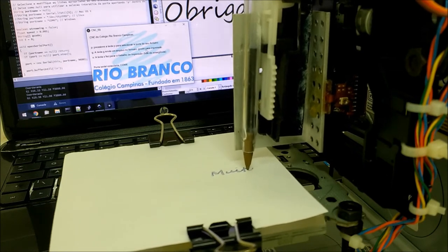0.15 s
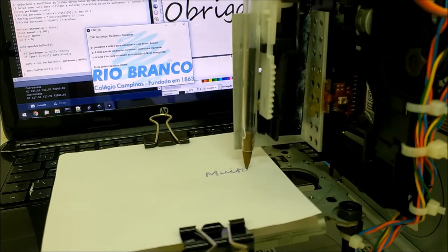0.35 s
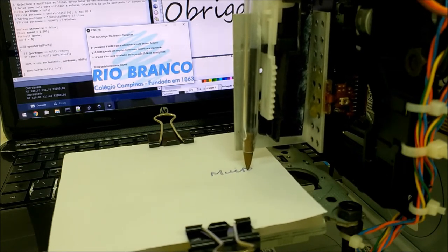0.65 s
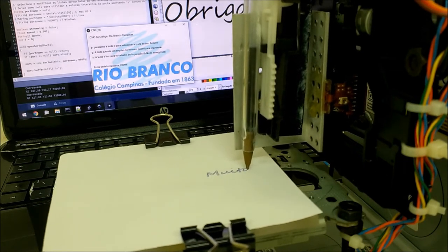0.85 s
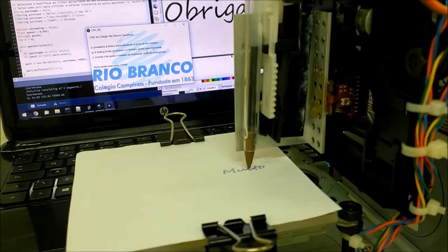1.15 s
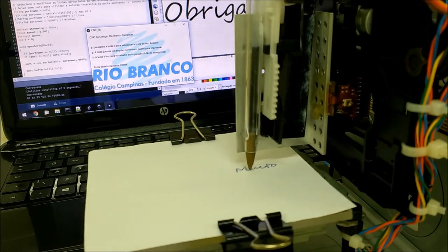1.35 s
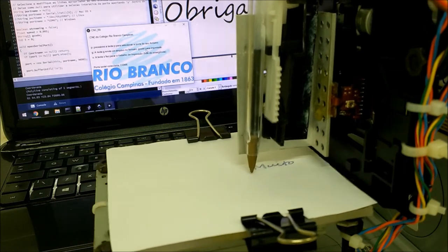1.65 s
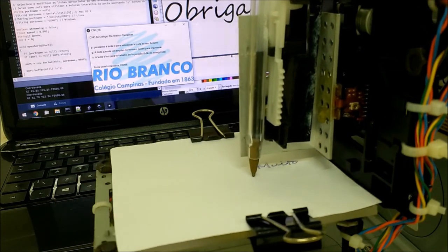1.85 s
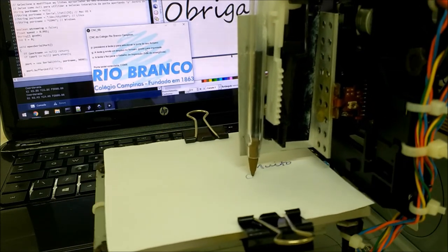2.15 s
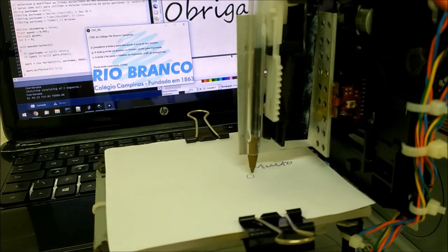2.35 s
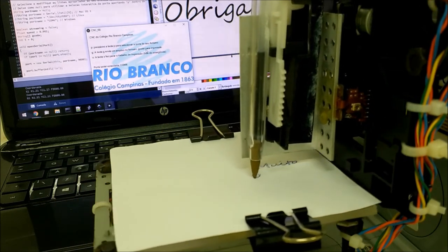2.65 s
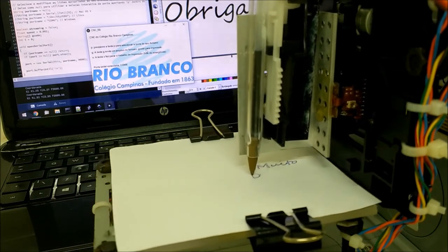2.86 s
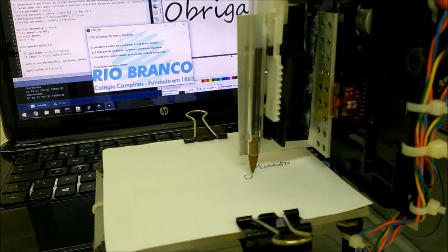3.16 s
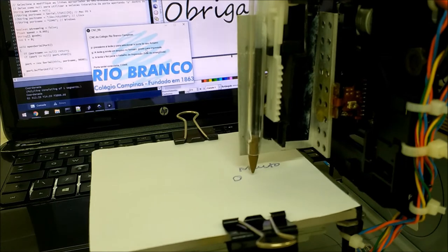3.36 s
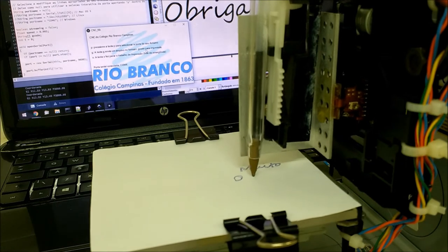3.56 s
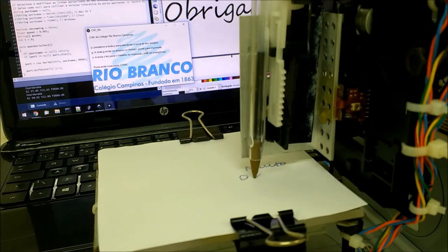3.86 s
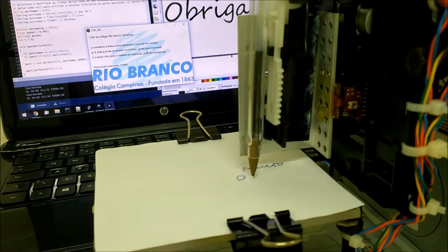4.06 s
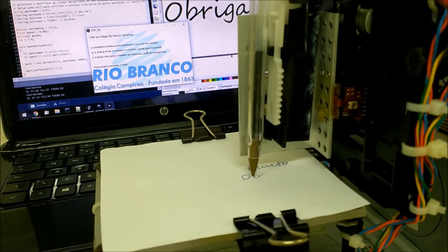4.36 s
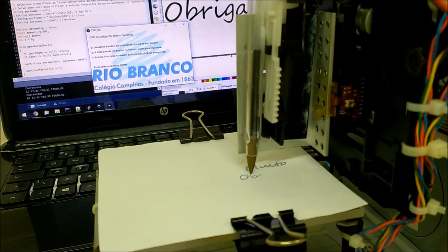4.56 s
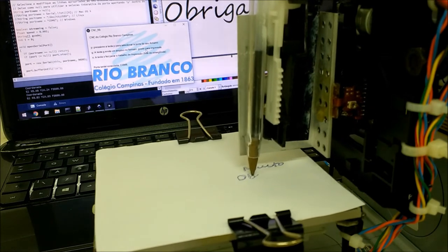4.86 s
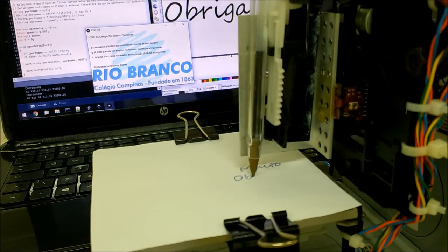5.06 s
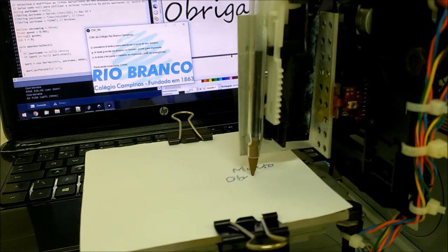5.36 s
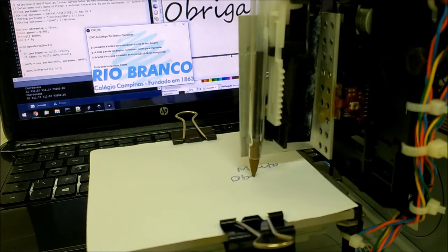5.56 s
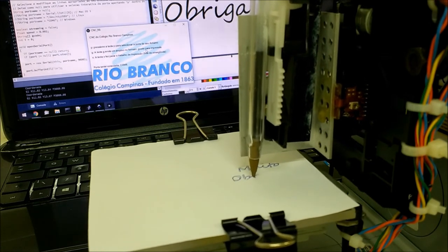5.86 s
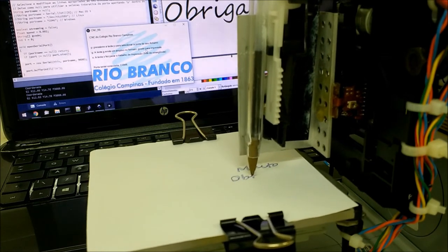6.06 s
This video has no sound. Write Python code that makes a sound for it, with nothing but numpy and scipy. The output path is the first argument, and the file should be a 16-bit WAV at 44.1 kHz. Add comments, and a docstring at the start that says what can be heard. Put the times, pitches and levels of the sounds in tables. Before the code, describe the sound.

A desktop drawing machine works right beside the microphone. Its motors stutter at one very high pitch, softer at first, buzz steadily for under a second while the bed shifts, then continue more strongly in tiny pulses. Dry friction noise, short chattering squeaks and very faint frame thuds accompany it, with a soft fan-like hum and small, dry room reflections.

```python
"""Stepper motors of a small pen plotter whine near 3.9 kHz, twice the rate at which their coil current is chopped.
The whine stutters in short dwells while the pen draws; in fast moves motion splits it into a buzz of even sidebands.
Friction of lead screws and slides is shaped noise with rasps and stick-slip squeaks, and the frame thuds faintly.
Below lies a low hum of narrow, wavering tones, perhaps a nearby laptop fan.
A quiet room adds short reflections, and two close microphone ports hear it all."""
import sys
import numpy as np
from scipy import signal
from scipy.fft import rfft, irfft, next_fast_len
from scipy.io import wavfile
from scipy.ndimage import uniform_filter1d

SR = 44100
rng = np.random.default_rng(int(sys.argv[2]) if len(sys.argv) > 2 else 0)


def generate_wav(signal):
    """Clip the signal to [-1, 1] and save it as 16-bit WAV at the path in sys.argv[1]."""
    frames = np.transpose(np.atleast_2d(signal))
    scaled = np.clip(frames, -1, 1) * 32767
    pcm = np.round(scaled).astype(np.int16)
    wavfile.write(sys.argv[1], SR, pcm)


N = 274302
TIME = np.arange(N) / SR
CHOP_HZ = 1952  # rate at which the coil current is chopped

# dwells, in which a rotor rests on a step that sings: start_s, length_s, level_db (before gain and swing)
DWELL_STEPS = [(0.078, 0.013, -38.5), (0.103, 0.013, -34), (0.161, 0.0083, -33.5), (0.19, 0.021, -35.5),
               (0.211, 0.0089, -34), (0.254, 0.013, -33), (0.3, 0.015, -34.5), (0.326, 0.014, -34.5),
               (0.357, 0.008, -36), (0.373, 0.01, -35), (0.395, 0.009, -33), (0.418, 0.031, -33),
               (0.453, 0.046, -33.0), (0.509, 0.028, -32.5), (0.599, 0.011, -35.0), (0.609, 0.015, -32),
               (0.649, 0.011, -34.5), (0.67, 0.0077, -34), (0.723, 0.015, -32.0), (0.739, 0.017, -35),
               (0.764, 0.012, -34.0), (0.814, 0.012, -37), (0.835, 0.0093, -35), (0.896, 0.013, -33.5),
               (0.916, 0.067, -34), (1.778, 0.012, -28.5), (1.823, 0.013, -33), (1.845, 0.011, -28),
               (1.865, 0.014, -30), (1.897, 0.0096, -33.0), (1.925, 0.016, -23.5), (1.954, 0.009, -33.0),
               (1.965, 0.018, -31), (1.99, 0.0087, -30), (2.012, 0.0089, -31), (2.064, 0.012, -28),
               (2.091, 0.01, -30.0), (2.116, 0.011, -30.5), (2.134, 0.013, -27.5), (2.167, 0.019, -32.5),
               (2.203, 0.054, -27.5), (2.265, 0.014, -28.0), (2.285, 0.013, -30.5), (2.309, 0.014, -33.0),
               (2.468, 0.035, -31.0), (2.504, 0.015, -27.5), (2.522, 0.012, -31), (2.544, 0.0096, -28.5),
               (2.591, 0.011, -25.5), (2.627, 0.0084, -28), (2.656, 0.009, -32.5), (2.685, 0.013, -34),
               (2.719, 0.0099, -29.5), (2.736, 0.011, -30), (2.782, 0.0081, -30), (2.8, 0.015, -30),
               (2.817, 0.016, -28), (2.836, 0.0097, -22.5), (2.847, 0.015, -26), (2.888, 0.01, -29),
               (2.914, 0.013, -31.5), (2.948, 0.0088, -31), (2.979, 0.011, -30.0), (3.029, 0.012, -29.5),
               (3.047, 0.013, -29.0), (3.103, 0.0086, -28.5), (3.122, 0.017, -29), (3.143, 0.014, -30.5),
               (3.164, 0.033, -28.5), (3.21, 0.055, -29), (3.455, 0.036, -27.5), (3.513, 0.017, -31.5),
               (3.545, 0.018, -28), (3.588, 0.011, -29), (3.601, 0.012, -26.5), (3.646, 0.012, -29.0),
               (3.668, 0.012, -30.0), (3.694, 0.009, -31), (3.706, 0.015, -27.5), (3.724, 0.012, -29),
               (3.745, 0.014, -33.5), (3.76, 0.0097, -27.5), (3.823, 0.012, -28.5), (3.838, 0.012, -32),
               (3.855, 0.02, -27.5), (3.891, 0.009, -26.5), (3.905, 0.013, -28.5), (3.921, 0.01, -33.5),
               (3.943, 0.0096, -31), (3.957, 0.011, -29), (3.997, 0.011, -31.0), (4.01, 0.012, -29),
               (4.029, 0.011, -29.5), (4.044, 0.01, -29), (4.058, 0.013, -28), (4.074, 0.027, -27.5),
               (4.106, 0.0072, -33.5), (4.12, 0.01, -30.5), (4.137, 0.026, -34.5), (4.171, 0.01, -29.5),
               (4.19, 0.01, -29.0), (4.209, 0.011, -29.5), (4.245, 0.0092, -28), (4.26, 0.016, -32),
               (4.291, 0.041, -28.5), (4.352, 0.0078, -32), (4.377, 0.03, -27), (4.41, 0.015, -26.5),
               (4.428, 0.023, -29), (4.452, 0.0069, -26), (4.467, 0.033, -26.5), (4.517, 0.02, -30.5),
               (4.554, 0.022, -28), (4.579, 0.013, -29), (4.615, 0.0081, -30), (4.629, 0.018, -30),
               (4.669, 0.027, -26.5), (4.727, 0.025, -32), (4.755, 0.014, -27), (4.791, 0.016, -28.5),
               (4.827, 0.012, -27), (4.843, 0.015, -27.0), (4.863, 0.011, -28.5), (4.885, 0.011, -30.0),
               (4.941, 0.012, -32.5), (5.002, 0.012, -27.5), (5.015, 0.019, -28.5), (5.039, 0.0081, -34.0),
               (5.065, 0.012, -29), (5.08, 0.013, -28), (5.109, 0.0087, -28.5), (5.159, 0.012, -29),
               (5.186, 0.012, -29.0), (5.21, 0.01, -30.5), (5.232, 0.075, -29.5), (5.38, 0.022, -28.5),
               (5.404, 0.023, -32), (5.44, 0.011, -26.5), (5.453, 0.012, -28.5), (5.484, 0.012, -32.5),
               (5.491, 0.017, -31.5), (5.518, 0.014, -30), (5.538, 0.014, -29.5), (5.558, 0.009, -32.5),
               (5.598, 0.0088, -29), (5.616, 0.0069, -28), (5.626, 0.015, -28.5), (5.643, 0.037, -29),
               (5.688, 0.013, -33.5), (5.725, 0.026, -27.5), (5.777, 0.016, -28), (5.81, 0.015, -28),
               (5.85, 0.013, -29), (5.881, 0.016, -36), (5.922, 0.043, -27.5), (5.971, 0.04, -31.0),
               (6.037, 0.009, -28.5), (6.05, 0.01, -28.5), (6.063, 0.011, -30.5), (6.096, 0.022, -29.0),
               (6.119, 0.019, -35.5), (6.154, 0.022, -29.5), (6.182, 0.013, -28)]


def amp(db):
    """Level to linear amplitude: 20 dB for each factor of ten."""
    return 10 ** (np.asarray(db) / 20)


def evened(x):
    """Normalisation to an rms of one."""
    return x / np.sqrt(np.mean(abs(x) ** 2) + 1e-20)


def read(points, hz):
    """Spectrum table interpolated on a logarithmic frequency axis."""
    f, value = np.transpose(points)
    return np.interp(np.log(hz + 1), np.log(f + 1), value)


def follow(rows, t):
    """Linear interpolation of each column of a curve table at times t."""
    s, *columns = np.transpose(rows)
    return [np.interp(t, s, c) for c in columns]


def gate(start, end, edge):
    """Switching window: one between two times, with linear edges."""
    return np.clip(np.minimum(TIME - start, end - TIME) / edge + .5, 0, 1)


def tone(hz, envelope):
    """Modulation of a sine by a complex envelope, whose rms it keeps."""
    return np.sqrt(2) * (envelope * np.exp(2j * np.pi * hz * TIME)).real


def waver(width_hz):
    """Narrow-band modulation: low-passed complex noise, half amplitude at width_hz."""
    t = np.arange(0, 7, 1 / 1000)
    z = rng.standard_normal(len(t)) + 1j * rng.standard_normal(len(t))
    f = np.fft.fftfreq(len(t), t[1])
    slow = np.fft.ifft(np.fft.fft(z) / (1 + (f / width_hz) ** 2))
    return evened(np.interp(TIME, t, slow))


def stepping(per_s):
    """Random stepwise modulation: coil current takes a new size and phase at every microstep."""
    step = np.cumsum(rng.random(N) < per_s / SR)
    z = rng.uniform(0.13, 1, N) * np.exp(2j * np.pi * rng.random(N))
    return evened(uniform_filter1d(z[step], size=60))


def flutter():
    """Amplitude modulation at a wandering rate, as the rotors speed up and hesitate."""
    rate_hz, wander, depth = 38, .6, .36  # the last two are shares
    turns = np.cumsum(rate_hz * (1 + wander * waver(width_hz=25).real)) / SR
    return evened(1 + depth * np.tanh(2 * np.sin(2 * np.pi * turns)))


def room(x, t60=0.025):
    """Early reflection: sparse decaying echoes from desk, screen and walls, different at each port."""
    t = np.arange(SR // 3) / SR
    sparse = rng.standard_normal((2, len(t))) * (rng.random((2, len(t))) < 2000 / SR)
    taps = sparse * amp(-60 * t / t60) * (t > .002)
    taps /= np.linalg.norm(taps, axis=1, keepdims=True)
    return signal.fftconvolve(x, taps, axes=1)[:, :N]


def hum(swell_db=-1):
    """Narrow-band random modulation: a low hum of wavering tones, two of which also swell and fade."""
    # steady-level tones: pitch_hz, width_hz, level_db, unsteady_share
    hum_tones = [(236, 9.9, -72.5, 0.67), (254, 2.9, -71.5, 0.63), (445.6, 9, -60.5, 0.77),
                 (485, 16, -54, 0.44), (595, 23, -60, .95), (704, 20, -61, 1), (979, 4.5, -83, 0.47)]
    # the two swelling tones: pitch_hz, width_hz, unsteady_share
    swelling_tones = [(516, 7, .22), (777, 16, .9)]
    # their levels before swell_db: time_s, lower_db, upper_db
    swell_curve = [(0.0, -59, -60), (0.35, -53, -46.5), (0.619, -48, -46.5), (0.9, -50, -53.5),
                   (1.6, -53.5, -56), (2.501, -74, -53.5), (3.4, -75, -53.5), (6.22, -69, -55.5)]
    out = np.zeros(N)
    for (hz, width, unsteady), db in zip(swelling_tones, follow(swell_curve, TIME)):
        out += tone(hz, amp(db + swell_db) * evened(1 - unsteady + unsteady * waver(width)))
    for hz, width, db, unsteady in hum_tones:
        out += tone(hz, amp(db) * evened(1 - unsteady + unsteady * waver(width)))
    return out


def shudder():
    """Impulsive excitation: each stop of a rotor jerks the frame into a low thud, unrelated at the two ports."""
    below_dwell_db, spread_db, decay_s, rumble_db = 57.5, 14, 0.021, -110
    low = signal.sosfilt(signal.butter(3, 90, fs=SR, output="sos"), rng.standard_normal((2, N)))
    jerks = np.zeros(N)
    for (s, _, db), chance in zip(DWELL_STEPS, rng.uniform(-0.42, 1, len(DWELL_STEPS))):
        jerks[int(np.clip(s * SR, 0, N - 1))] = amp(db - below_dwell_db + spread_db * chance)
    decaying = signal.lfilter([1], [1, -np.exp(-1 / (decay_s * SR))], jerks)
    return (amp(rumble_db) + decaying) * evened(low)


def rubbing(travel_hiss, patchy_db=1.68, flicker_db=1.0, body_depth=0.52, fizz_depth=0.77):
    """Friction noise: random spectra shaped by the rubbing effort, with rasps at rough spots and a fine flicker."""
    # relative spectrum of screws and slides: frequency_hz, level_db
    friction_spectrum = [(90, -27), (130, -37), (190, -38), (250, -12.5), (330, -11), (470, -4), (1000, -2),
                         (1400, 1), (3500, -1.5), (4450, -3.5), (5050, -8), (5560, -2.5), (6000, -1),
                         (6600, -4.5), (10500, -9), (13000, -12.5), (15700, -14)]
    # how hard they rub; only departures from each mean count: time_s, body_db, fizz_db
    effort = [(0.0, -37.5, -42), (0.28, -36.5, -46.5), (1.12, -43.5, -43), (1.56, -37.5, -42),
              (1.73, -42, -46.5), (1.91, -30, -50), (2.1, -38.5, -46.5), (2.55, -36, -47.5),
              (3.0, -40.5, -41), (3.3, -39, -46), (4.35, -42, -44), (4.5, -39.5, -43), (4.92, -40.5, -46),
              (5.08, -41.5, -45.5), (5.55, -42.5, -38), (5.78, -43, -41.5), (6.22, -45, -43.5)]
    # rough spots rasping in one band: centre_s, half_length_s, centre_hz, half_width_hz, rise_db, glide_hz_per_s
    rough_spots = [(0.16, 0.048, 8800, 400, 11.5, 0), (0.314, 0.16, 1296, 92, 8.5, 0),
                   (0.39, 0.076, 4500, 303, 9.5, 0), (0.93, 0.11, 6720, 507, 11, 0),
                   (0.453, 0.029, 1510, 100, 12, 0), (2.125, 0.044, 2640, 120, 13, 0),
                   (2.317, 0.12, 2380, 170, -3, -1500), (2.53, 0.055, 3000, 220, 7, -2000),
                   (2.584, 0.05, 4220, 250, 10.5, 0), (2.751, 0.11, 2320, 120, 6, 0),
                   (4.298, 0.078, 3470, 170, 7, -2000), (4.461, 0.097, 3310, 200, 12, 0),
                   (4.613, 0.14, 10700, 700, 10.5, 3002), (5.291, 0.1, 4904, 300, 11, 0),
                   (5.554, 0.055, 3464, 292, 13, 2), (5.545, 0.029, 11780, 2300, 14.5, 0),
                   (5.591, 0.083, 1565, 100, 5.5, 0), (5.64, 0.036, 10500, 1200, 10, 0),
                   (5.847, 0.044, 11300, 1900, 9, 0), (5.92, 0.11, 9640, 400, 16, -2500)]
    # screw hiss around chopper lines in fast moves: chop_multiple, half_width_hz, rise_db (at full hiss)
    hiss_bands = [(2, 590, 5), (4, 970, 3.5)]
    # likeness of the noise at the two ports: frequency_hz, likeness_share
    likeness = [(200, 0.84), (700, 0.98), (1500, 0.58), (3500, 0.84), (6000, 0.94), (10000, 0.5),
                (15000, 1)]
    # frames of 512 samples, 128 apart
    t, hz = np.arange(N // 128 + 5) * 128 / SR, np.fft.rfftfreq(512, 1 / SR)
    a, b, c, d, patches = rng.standard_normal((5, len(t), len(hz)))
    patches = uniform_filter1d(patches, size=16, axis=0)
    patches = evened(uniform_filter1d(patches, size=5, axis=1))
    body, fizz = (level - level.mean() for level in follow(effort, t))
    field_db = read(friction_spectrum, hz) + patchy_db * patches
    field_db += flicker_db * rng.standard_normal((len(t), 1))
    # share of each effort felt at each frequency
    body_share = read([(500, 0.3), (1300, 0.57), (4000, 0.72), (8000, 0.66)], hz)
    fizz_share = read([(4000, 0.067), (9000, 0.84)], hz)
    field_db += body_depth * np.outer(body, body_share) + fizz_depth * np.outer(fizz, fizz_share)
    for s, length, centre, width, db, glide in rough_spots:
        since = t[:, None] - s
        field_db += db * np.exp(-(since / length) ** 2 - ((hz - centre - glide * since) / width) ** 2)
    travelling = np.interp(t, TIME, travel_hiss)
    for k, width, db in hiss_bands:
        field_db += db * np.outer(travelling, np.exp(-((hz - round(k) * CHOP_HZ) / width) ** 2))
    # the second port shares part of the first port's noise
    same, left = np.clip(read(likeness, hz), 0, 1), a + 1j * b
    right = same * left + np.sqrt(1 - same ** 2) * (c + 1j * d)
    z = np.array([left, right]) * amp(field_db)
    noise = signal.istft(z.transpose(0, 2, 1), nperseg=512, noverlap=384)[1][:, :N]
    return amp(-36.5) * evened(noise)


def squeaks():
    """Stick-slip oscillation of the slides: short chattering tones that swell, fade and arch in pitch."""
    # centre_s, half_length_s, pitch_hz (before arch and jitter), glide_hz_per_s, level_db (before chatter)
    squeak_events = [(1.533, .018, 3070, 0, -42), (2.262, .04, 2670, -1300, -41),
                     (2.33, .045, 2400, -8, -40), (2.335, 0.057, 2280, -300, -39),
                     (2.516, 0.021, 3110, 0, -40), (2.572, 0.019, 2694, -2500, -41.5),
                     (2.709, .02, 2380, 0, -51), (2.869, 0.021, 2910, 0, -38),
                     (3.282, 0.034, 2280, -3, -43), (3.35, .042, 2190, -300, -39),
                     (3.435, 0.019, 2820, 0, -51), (3.91, .05, 2394, -600, -43),
                     (4.313, 0.03, 3340, -500, -39), (4.481, .04, 3240, -800, -43),
                     (4.487, .06, 2140, 1700, -39.5), (5.565, 0.024, 3227, -2000, -37),
                     (5.682, .035, 3020, 0, -42.5)]
    arch_hz, jitter_hz, chatter_share = 45, 50, .9  # the arch is the drop half a length from the centre
    jitter, chatter = jitter_hz * waver(width_hz=60).real, chatter_share * waver(width_hz=90)
    out = np.zeros(N)
    for s, length, hz, glide, db in squeak_events:
        at = np.flatnonzero(abs(TIME - s) < np.pi * length)
        since = TIME[at] - s
        draw = (at + rng.integers(N)) % N  # a random stretch of the jitter and chatter
        pitch = hz + glide * since - arch_hz * (since / length) ** 2 + jitter[draw]
        swell = amp(db) * np.exp(-(since / length) ** 2) * evened(1 + chatter[draw])
        out[at] += np.sqrt(2) * (swell * np.exp(2j * np.pi * np.cumsum(pitch) / SR)).real
    return out


def buzz(sidebands, rate_hz, on):
    """Sideband modulation: the turning field splits chopper lines into evenly spaced ones that sway in level."""
    out, t = np.zeros(N), TIME[on > 0]
    for k, order, db in sidebands:
        start, sway, pace = rng.random(3)
        level = amp(db) * (.95 + .35 * np.sin(2 * np.pi * (sway + (3 + 9 * pace) * t)))
        turns = start + (k * CHOP_HZ + order * rate_hz) * t
        out[on > 0] += np.sqrt(2) * level * np.cos(2 * np.pi * turns)
    return out


def travel(on, bed_db, carriage_db, idle_db, lean_db):
    """Load-dependent modulation in a fast move: the bed's main line leans towards its first lower sideband."""
    # all three: chop_multiple, motor_rate_multiple, level_db (before the gain of the move, lean and sway)
    bed_lines = [(2, -3, -59), (2, -2, -52), (2, -1, -51.5), (2, 0, -46), (2, 2, -53), (4, -3, -59),
                 (4, -2, -52), (4, 0, -56), (4, 1, -56), (4, 2, -54), (4, 3, -52), (4, 4, -58), (4, 5, -62),
                 (6, -5, -66), (6, -3, -66)]
    carriage_lines = [(1, -1, -56), (1, 0, -59), (2, -4, -59), (2, -3, -56), (3, -3, -51), (3, 4, -52),
                      (4, -4, -59)]
    # lines of an idling coil
    idle_lines = [(1, 0, -47), (3, 0, -41), (4, 0, -48)]
    bed_hz, carriage_hz = 215.5, 38  # sideband spacing at full speed
    lean = {(2, -1): lean_db, (2, 0): -lean_db / 2}
    bed = [(k, order, db + lean.get((k, order), 0)) for k, order, db in bed_lines]
    sound = amp(bed_db) * buzz(bed, bed_hz, on)
    sound += amp(carriage_db) * buzz(carriage_lines, carriage_hz, on)
    sound += amp(idle_db) * buzz(idle_lines, 0, on)
    return on * sound


def slewing(drawing, held):
    """Frequency modulation: side tones glide with the rotors' speed and fade as they come to rest."""
    # chop_multiple, stepping_rate_multiple, relative_level_db
    side_tones = [(2, -1, -2.5), (2, 1, -11), (4, -1, -7), (4, 2, -7)]
    # common strength, most in the first quick strokes: time_s, level_db (before flutter)
    strength = [(0, -40), (.25, -38), (.9, -39), (1.8, -51), (6.22, -49)]
    rate_hz, wander = 145, .2  # stepping rate while drawing, and its wander as a share
    level = amp(follow(strength, TIME)[0]) * drawing * (1 - held) * flutter()
    turns = np.cumsum(rate_hz * (1 + wander * waver(width_hz=10).real)) / SR
    out = np.zeros(N)
    for k, order, db in side_tones:
        glide = np.exp(2j * np.pi * round(order) * turns)
        out += tone(round(k) * CHOP_HZ, amp(db) * level * stepping(per_s=64) * glide)
    return out


def overtones(drawing, held, base_db=7.0):
    """Harmonics of the chopper: shaken by the steps, cleaner while the rotors are held."""
    # chop_multiple, level_db, steady_share, held_rise_db (change of level while held)
    harmonics = [(3, -41, 0.6, -6), (4, -42.5, 0, 6.5), (6, -58, 0.1, 11.5), (8, -58, .1, 11)]
    # tone at the chopper rate itself: time_s, level_db (before base_db)
    base_curve = [(0.0, -59), (0.15, -58), (0.35, -51.5), (0.55, -60), (0.6, -54), (0.9, -61.5),
                  (0.94, -47), (1.02, -62), (2.06, -64), (2.13, -52), (2.65, -60), (3.01, -54.5),
                  (3.03, -43), (3.26, -89), (3.31, -57), (3.78, -66), (4.04, -52), (4.07, -82), (4.16, -49),
                  (4.21, -69), (4.38, -64), (4.43, -50), (4.52, -71), (4.57, -48), (4.73, -66),
                  (4.94, -48.5), (5.06, -61), (5.21, -48), (5.67, -62.5), (6.08, -46.5), (6.22, -64)]
    pulsing = flutter()

    def current(steady):
        """Partial coherence: a steady part and a part that jumps with the microsteps."""
        share = np.clip(steady + held * (1 - steady), 0, 1)
        mixed = share + np.sqrt(1 - share ** 2) * stepping(per_s=200)
        return mixed * (held + (1 - held) * pulsing)
    base = amp(base_db + follow(base_curve, TIME)[0])
    out = tone(CHOP_HZ, drawing * base * current(steady=.9))
    for k, db, steady, rise_db in harmonics:
        out += tone(round(k) * CHOP_HZ, drawing * amp(db + rise_db * held) * current(steady))
    return out


def whine(drawing, dwell_db=-0.35, settle=0.03, attack=0.0014, release=0.003065, passing_rough=1.0, passing_db=-1.0):
    """Forced vibration at twice the chopper rate in each dwell; also returns how firmly the rotors are held."""
    # whine of microsteps passing between the dwells: time_s, level_db (before passing_db)
    passing = [(0, -52), (.2, -40), (.57, -41.5), (.75, -37.5), (1.8, -38.5), (2.9, -37.5), (3.4, -33),
               (4.4, -37), (4.95, -38), (5.5, -36), (6.22, -35.5)]
    ring_s, overshoot, tremble = .0005, .38, .16  # the last two are shares of the level
    sag_hz, dwell_flat_hz, pull_s = 36, 26, .03  # flatness while turning; in brief dwells; length that cures it
    song, resting, held, flat_hz = np.zeros(N), np.zeros(N), np.zeros(N), np.full(N, 1. * sag_hz)
    tremor = waver(width_hz=110).real
    for s, length, db in DWELL_STEPS:
        at = np.flatnonzero((TIME > s - attack / 2) & (TIME < s + length + release / 2))
        age = TIME[at] - s
        shape = np.clip(np.minimum(age / attack, (length - age) / release) + .5, 0, 1)
        # the level swells to a peak and trembles until the rotor has settled
        unsettled = np.exp(-(age / settle) ** 2)
        arch = np.sin(np.pi * np.clip(age / min(length, settle), 0, 1)) - .5
        swing = 1 + unsettled * (overshoot * arch + tremble * tremor[at])
        song[at] = np.maximum(song[at], amp(db + dwell_db) * shape * swing)
        resting[at] = np.maximum(resting[at], shape)
        held[at] = shape * (1 - unsettled / 2)
        flat_hz[at] = dwell_flat_hz * np.exp(-(length / pull_s) ** 2)
    keep = np.exp(-1 / (ring_s * SR))
    song = signal.lfilter([1 - keep], [1, -keep], song) * (1 + .07 * waver(width_hz=160))
    # quick microsteps between the dwells give a flatter, rougher whine
    rough = np.clip(passing_rough, 0, 1)
    steps = np.sqrt(1 - rough ** 2) + rough * stepping(per_s=260)
    passing_level = amp(passing_db + follow(passing, TIME)[0])
    song += passing_level * drawing * (1 - resting) * steps * flutter()
    flattening = np.exp(-2j * np.pi * np.cumsum(flat_hz) / SR)
    return tone(2 * CHOP_HZ, song * flattening), held


def scene():
    """Superposition of both motors close by, the slides, the hum and the thuds, with a little room."""
    # fast moves: start_s, end_s, bed_gain_db, carriage_gain_db, idle_coil_gain_db,
    # lean_db (to the first lower sideband), screw_hiss_share
    fast_moves = [(0.984, 1.756, 1, 0, -19, 2, 0.9), (2.32, 2.45, -1, -5, 0.5, 3, 0),
                  (3.264, 3.456, 0.5, -12, -7, 1, 0), (5.303, 5.38, -2, -7, 2.5, 7, 0.4)]
    moves = [gate(start, end, edge=0.0068) for start, end, *_ in fast_moves]
    drawing = 1 - sum(moves)
    song, held = whine(drawing)
    motors = song + overtones(drawing, held) + slewing(drawing, held)
    travelling = np.zeros(N)
    for on, (_, _, bed_db, carriage_db, idle_db, lean_db, hiss) in zip(moves, fast_moves):
        motors += travel(on, bed_db, carriage_db, idle_db, lean_db)
        travelling += hiss * on
    slides = rubbing(travelling) + squeaks()
    reflected = amp(-23) * motors + amp(-10) * slides
    return motors + slides + hum() + shudder() + room(reflected)


def record(dry):
    """Interchannel differences: phase and level between the ports vary with frequency; then the band limit."""
    # phase by which the left port leads: frequency_hz, lead_rad
    phase_lead = [(0, 0), (260, 2.18), (600, 1.1), (950, 1.2), (1550, 0), (4570, -0.5), (5510, -1.6),
                  (5770, -2.5), (8180, -4.1), (10400, -6.2), (11000, -6.3), (13500, -9.3), (15000, -9.5),
                  (15500, -10.3)]
    # level of left over right: frequency_hz, difference_db
    level_tilt = [(100, 1.6), (400, -1.2), (1000, -1.1), (2000, 0), (3900, 1.4), (5800, -1.8),
                  (8000, -0.44), (15000, 0.18)]
    size = next_fast_len(N + SR // 10)
    hz = np.fft.rfftfreq(size, 1 / SR)
    # each port takes half of the difference
    half = amp(read(level_tilt, hz) / 2) * np.exp(.5j * read(phase_lead, hz))
    ports = irfft(rfft(dry, size) * np.array([half, 1 / half]), size)[:, :N]
    low_pass = signal.firwin(1023, 15800, window=("kaiser", 9), fs=SR)  # edge in Hz
    return signal.oaconvolve(ports, low_pass[None], "same")


dry = scene()
out = record(dry)
generate_wav(out)
```